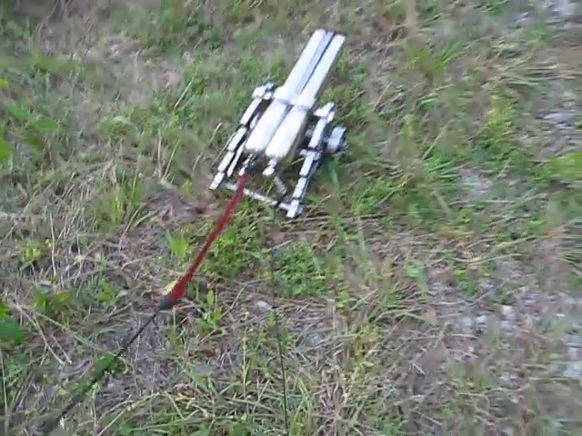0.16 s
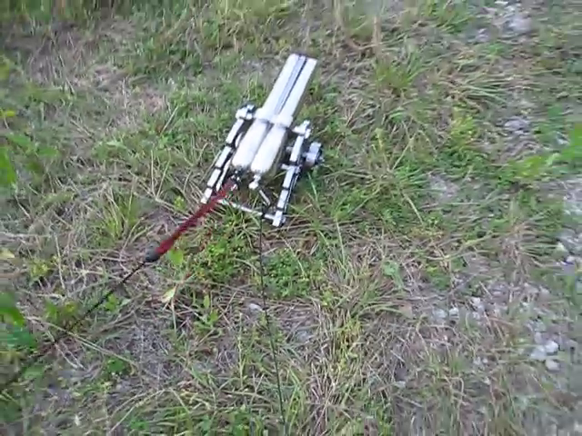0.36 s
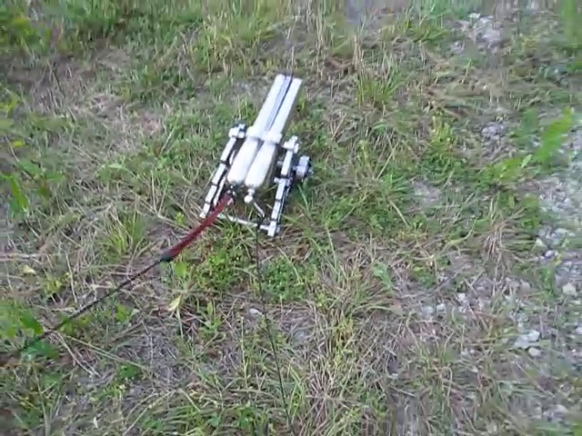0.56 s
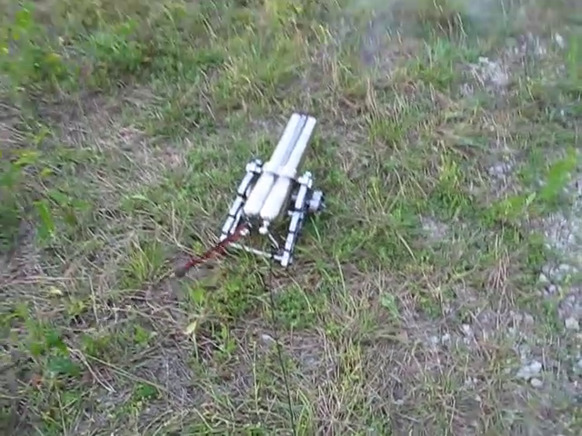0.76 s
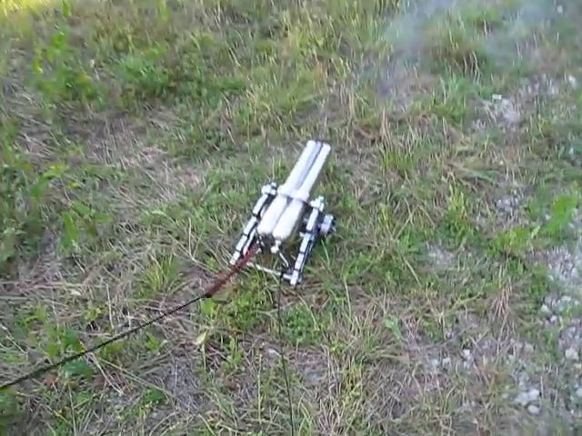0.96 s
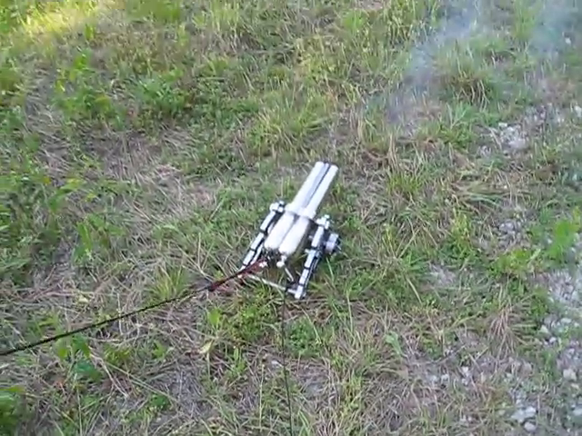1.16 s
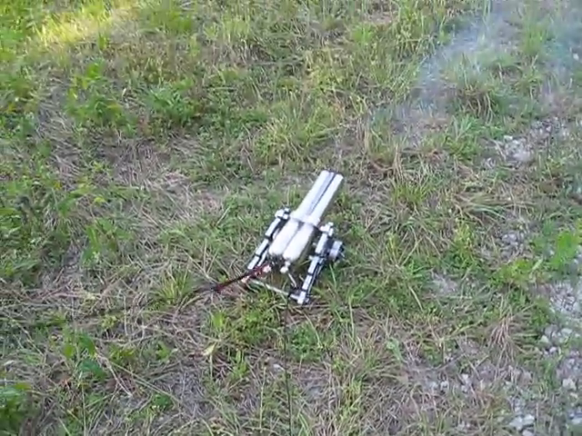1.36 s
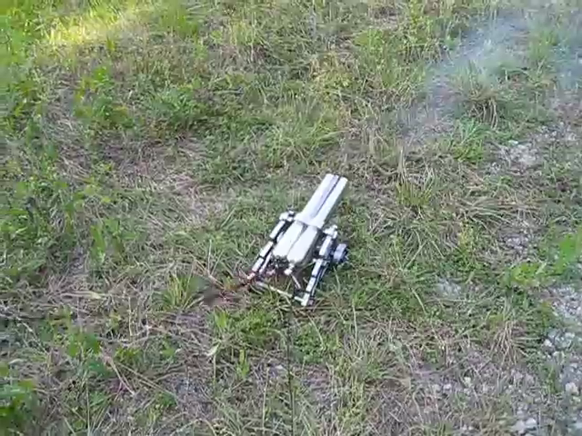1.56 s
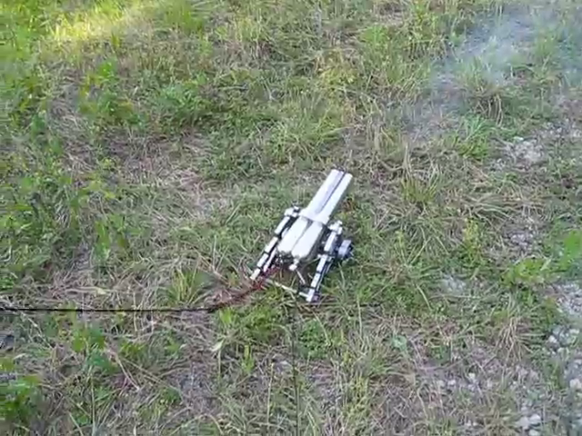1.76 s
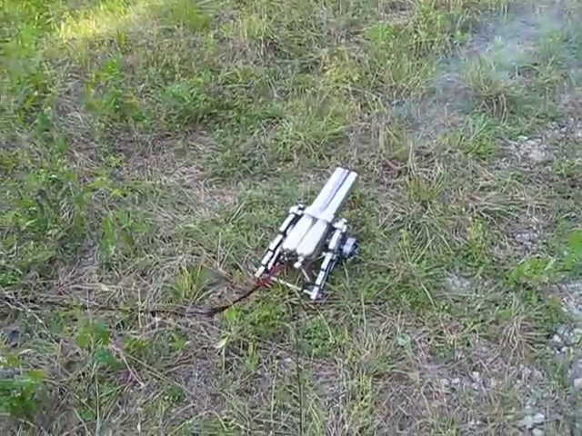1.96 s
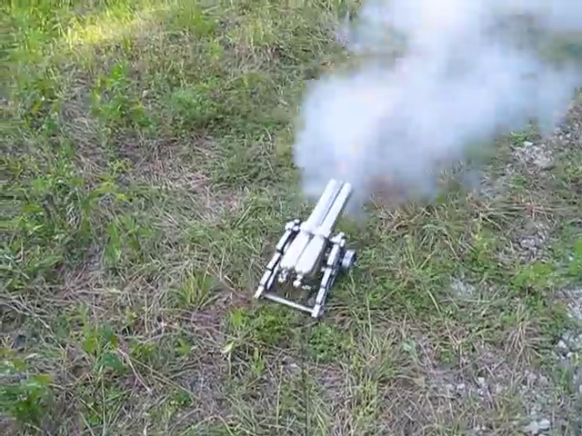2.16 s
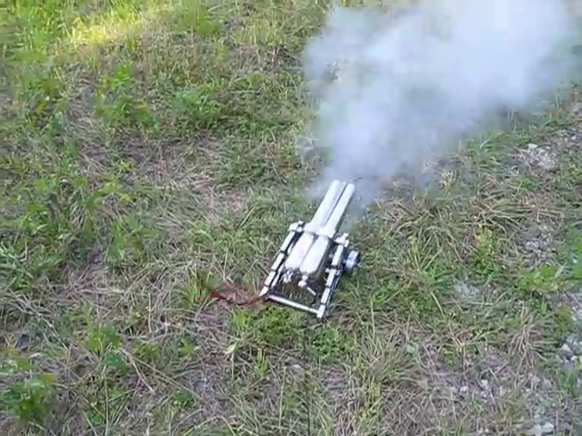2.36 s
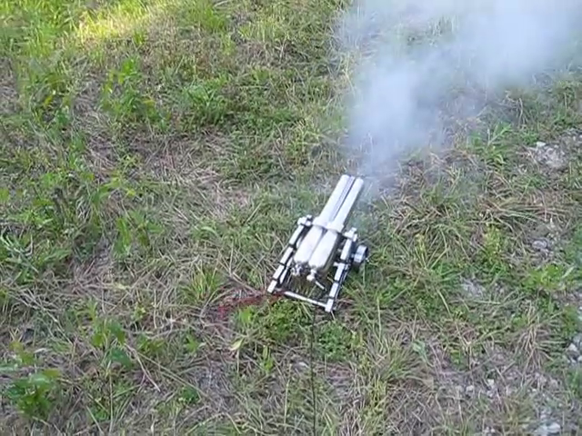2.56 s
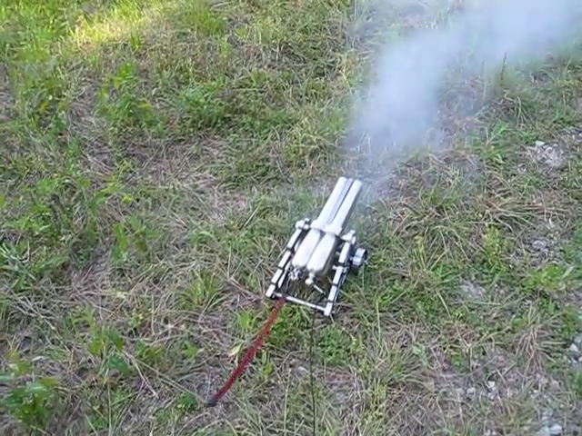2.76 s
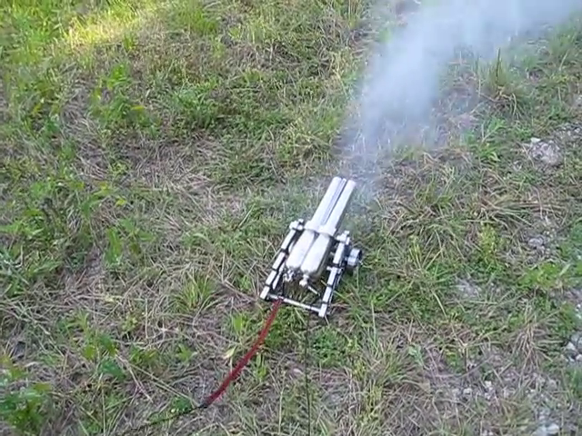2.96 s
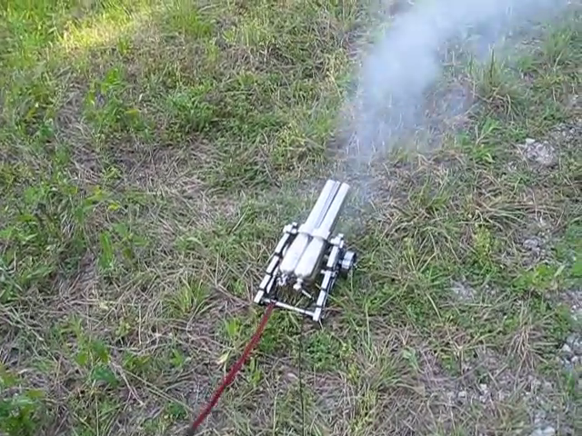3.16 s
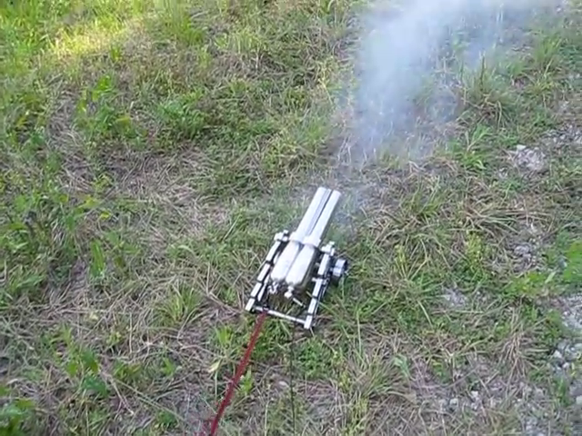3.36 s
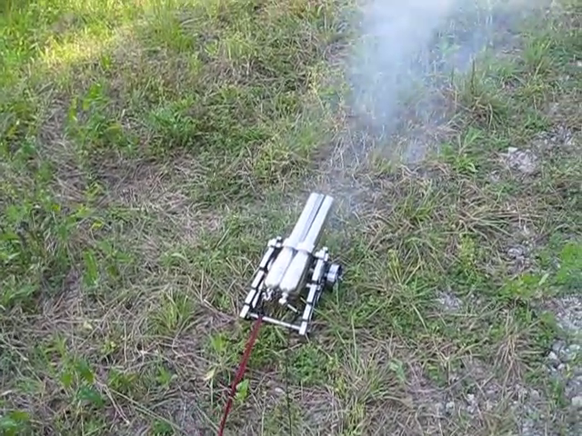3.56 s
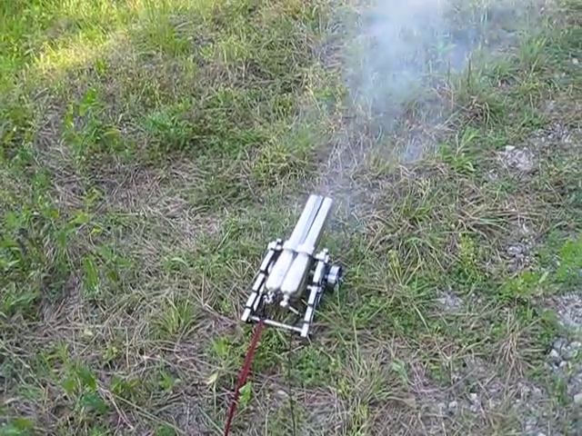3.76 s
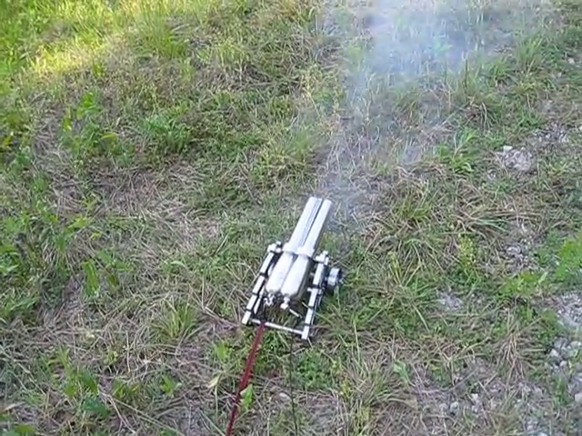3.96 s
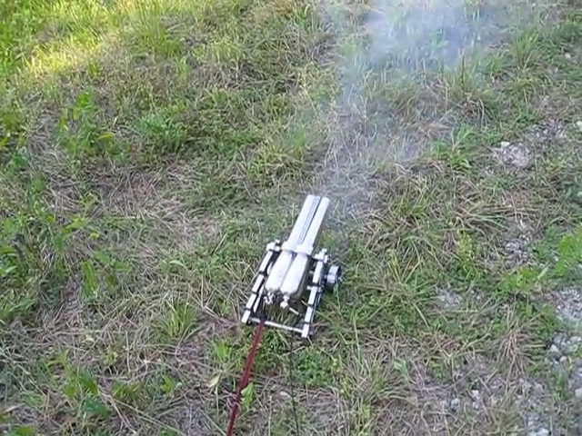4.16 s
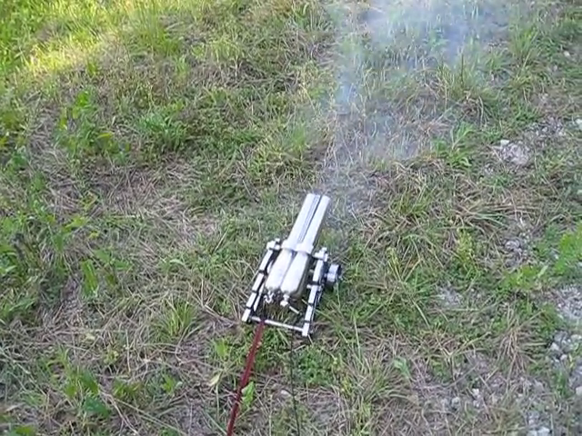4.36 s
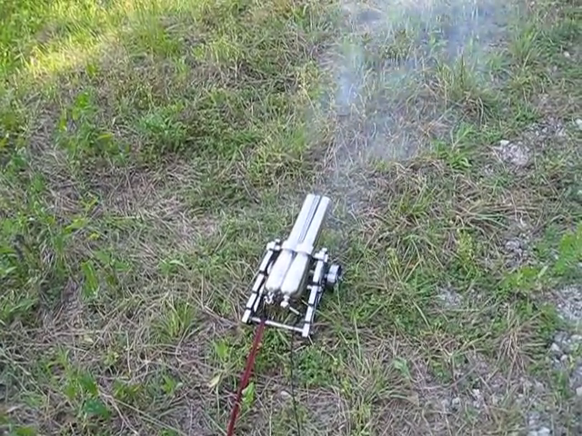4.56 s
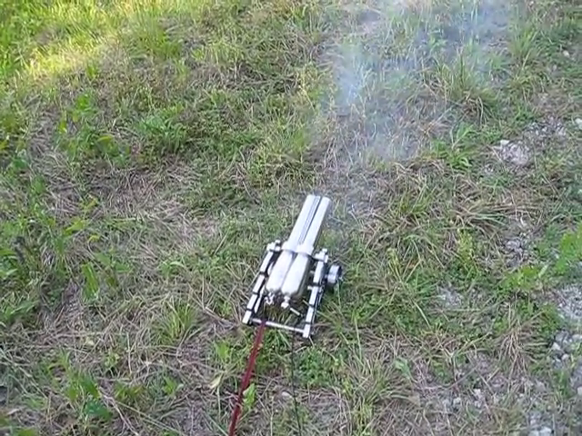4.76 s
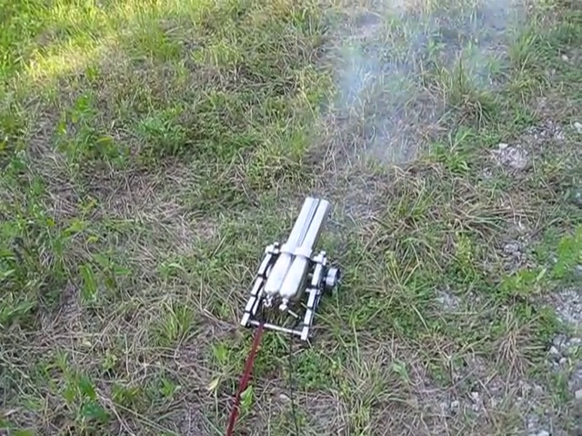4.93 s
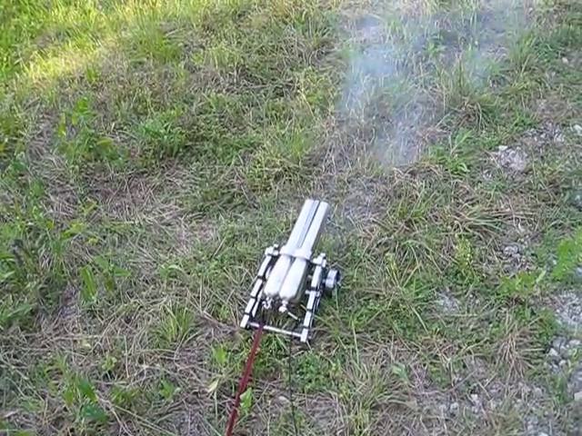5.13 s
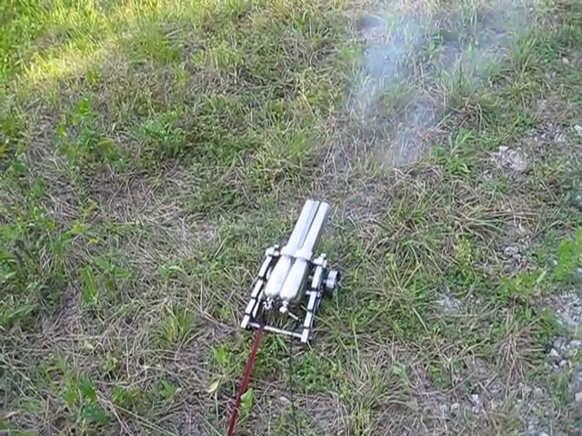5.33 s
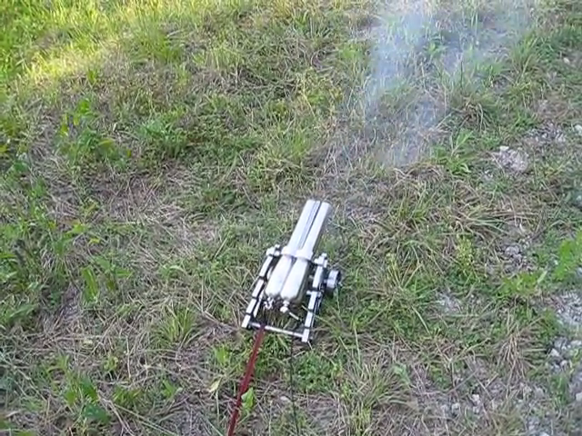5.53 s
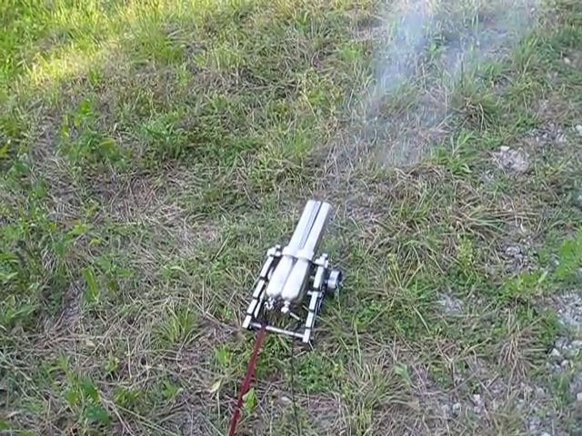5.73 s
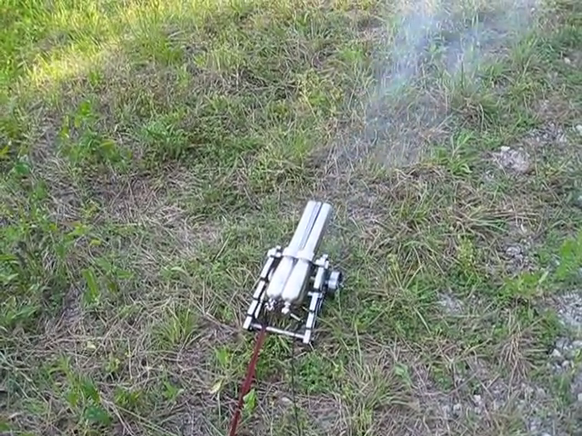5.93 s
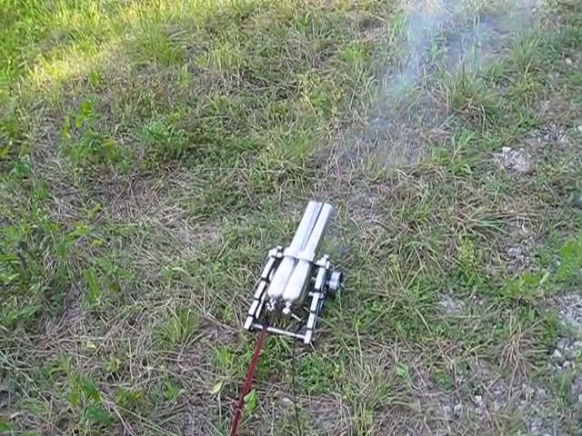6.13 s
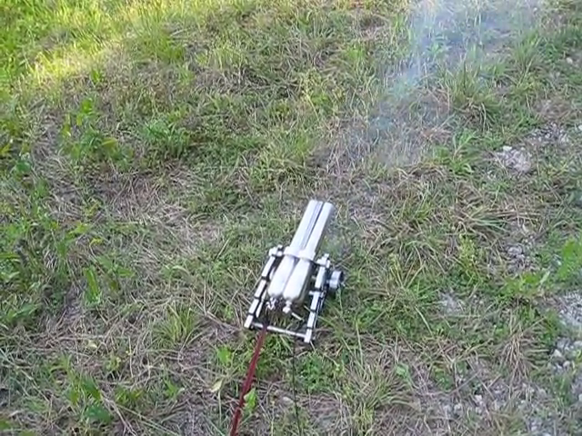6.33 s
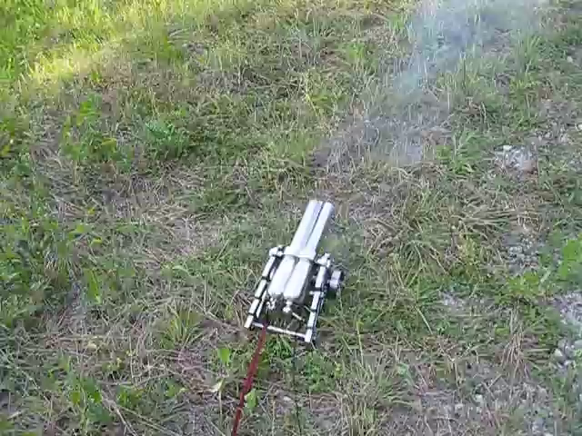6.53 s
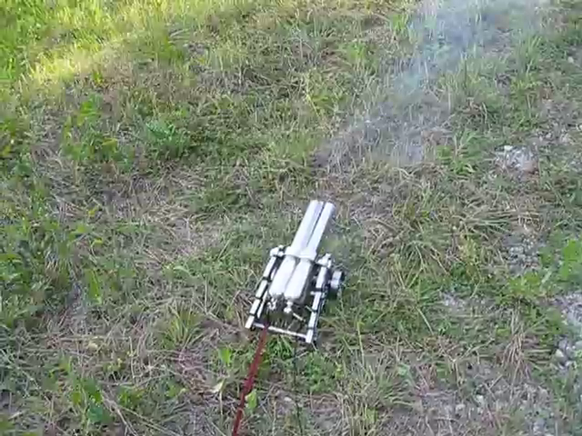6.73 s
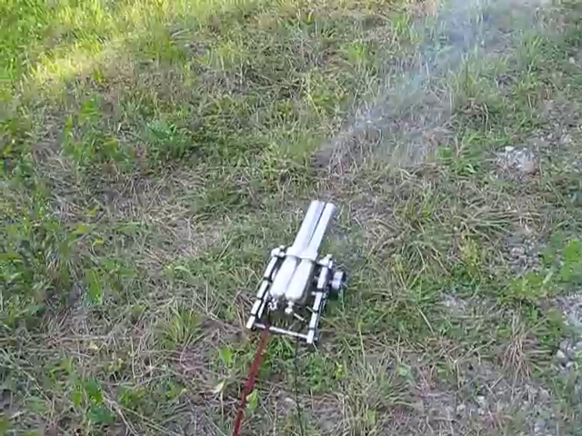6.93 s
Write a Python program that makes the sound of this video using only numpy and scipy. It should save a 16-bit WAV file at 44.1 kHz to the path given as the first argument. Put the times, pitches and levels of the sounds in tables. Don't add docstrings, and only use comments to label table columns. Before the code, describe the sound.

Light handling clicks and soft rustle outdoors, one violent overloaded bang at two seconds, slapback echoes, a darkening roar, then faint birds and a twig snap.

```python
import sys
import numpy as np
from scipy import signal
from scipy.fft import rfft, irfft, next_fast_len
from scipy.io import wavfile
from scipy.ndimage import uniform_filter1d

SR = 44100
rng = np.random.default_rng(int(sys.argv[2]) if len(sys.argv) > 2 else 0)


def log_audio(samples):
    frames = np.atleast_2d(samples).T
    limited = np.clip(frames, -1, 1)
    pcm = np.round(limited * 32767).astype(np.int16)
    wavfile.write(sys.argv[1], SR, pcm)


def elevation(decibels):
    levels = np.asarray(decibels, float)
    return 10 ** (levels / 20)


N = 312624
TIME = np.arange(N) / SR
COARSE_TIME = TIME[::32]


def noise(n=N):
    return rng.standard_normal(n)


def walk(rate_hz):
    hold = int(SR / rate_hz)
    steps = np.repeat(noise(N // hold + 1), hold)
    return 1.35 * uniform_filter1d(uniform_filter1d(steps, hold), hold)[:N]


def unit(x):
    return x / np.sqrt(np.mean(x ** 2))


def band(x, hz, width_hz):
    return signal.lfilter(*signal.iirpeak(hz, hz / width_hz, SR), x)


def band_twice(x, hz, width_hz):
    return unit(band(band(x, hz, width_hz), hz, width_hz))


def bin_hz(size):
    return np.maximum(np.arange(size // 2 + 1) * SR / size, 1.)


def tint(x, colour):
    size = next_fast_len(len(x))
    hz, db = np.transpose(colour)
    gain_db = np.interp(np.log(bin_hz(size)), np.log(hz), db)
    return unit(irfft(rfft(x, size) * elevation(gain_db), size)[:len(x)])


def thirds(x):
    size = next_fast_len(len(x))
    spectrum = rfft(x, size)
    place = 3 * np.log2(bin_hz(size))
    for hz in 25 * 2 ** (np.arange(29) / 3):
        triangle = np.clip(1 - abs(place - 3 * np.log2(hz)), 0, 1)
        yield hz, irfft(spectrum * triangle, size)[:len(x)]


def add(out, s, piece):
    i = int(s * SR)
    out[i:i + len(piece)] += piece[:N - i]


def swell(s, db, rise_s, fall_s):
    away = (COARSE_TIME - s) / np.where(COARSE_TIME < s, rise_s, fall_s)
    return np.interp(TIME, COARSE_TIME, elevation(db - 12 * away ** 2))


def bursts(events):
    out, t = np.zeros(N), TIME[:9000]
    for s, db, rise_s, t60_s, hz, width_hz in events:
        shape = (1 - np.exp(-t / rise_s)) * elevation(-60 * t / t60_s)
        add(out, s, elevation(db) * shape * band_twice(noise(len(t)), hz, width_hz))
    return out


def strikes(events, overtone_ratio, late_s):
    out, t = np.zeros(N), TIME[:2500]
    for s, db, hz, t60_s, overtone_db, edge_db in events:
        shape = (1 - np.exp(-t * hz / 0.36)) ** 2 * elevation(-60 * t / t60_s)
        overtone_gain = elevation(overtone_db + 3.0 - 60 * t / (1.5 * t60_s))
        overtone = overtone_gain * np.sin(2 * np.pi * overtone_ratio * hz * t)
        ring = shape * (np.sin(2 * np.pi * hz * t) - overtone)
        edge = band(noise(len(t)), 13500.0, 15000.0) * elevation(-60 * t / 0.0035)
        add(out, s + late_s, elevation(db) * (ring / shape.max() + elevation(edge_db + 7.0) * edge))
    return out


# f/Hz, density/dB
FIELD_COLOUR = [(20, -15), (43, -8.5), (90, -1), (160, -6), (300, -6), (500, -2.5), (760, 0), (1150, -2.5),
                (1500, -7.5), (2900, -14), (3500, -17.5), (9000, -24), (14000, -31.5), (17300, -40)]
FIELD_DB = -42
DUCK_FROM_DB, DUCK_SHARE = -19, 0.32


def field():
    air = tint(noise(), FIELD_COLOUR)
    bass = signal.lfilter(*signal.butter(2, 250., fs=SR), air)
    air = (air - bass) * elevation(.4 * walk(2.97)) + bass * elevation(1.8 * walk(5))
    duck_db = -DUCK_SHARE * np.clip(roll_level_db() - DUCK_FROM_DB, 0, None)
    return air * elevation(FIELD_DB + duck_db)


# t/s, length/s, first f/Hz, last f/Hz, level/dB
CHIRPS = [(1.008, .025, 1600, 2000, -46), (1.022, .065, 2090, 1830, -43), (1.085, .11, 1840, 2010, -48),
          (1.075, .25, 2060, 1900, -52), (1.025, .035, 3100, 2950, -52), (1.075, .07, 2770, 2800, -55),
          (1.22, .14, 1950, 1900, -54), (1.2, .02, 1850, 1700, -49), (1.625, .05, 1870, 1740, -47),
          (2.02, .05, 2480, 2150, -56), (4.735, .23, 2520, 2330, -50.5), (4.73, .12, 3350, 3300, -56.5),
          (5.275, .1, 2520, 2450, -52), (5.79, .04, 2080, 2020, -52), (5.84, .04, 1720, 1680, -52)]
SLIDES = [
    (4.85, .18, 3230, 2860, -44.5),
    (5.4, .18, 3150, 2780, -52.5),
    (1.42, .125, 1900, 2030, -50),
]
CHIRP_FADE_DB, SLIDE_GROW_DB = 8, 15
CHIRP_SAG, SLIDE_SAG = 1.2, 2.3


def whistles():
    out, wobble, flutter = np.zeros(N), 1 + .006 * walk(150), elevation(2.1 * walk(90))
    kinds = (CHIRPS, 0, -CHIRP_FADE_DB, CHIRP_SAG), (SLIDES, -SLIDE_GROW_DB, 0, SLIDE_SAG)
    for notes, first_db, last_db, sag in kinds:
        for start_s, length_s, first_hz, last_hz, db in notes:
            span = slice(int(start_s * SR) - 400, int((start_s + length_s) * SR) + 400)
            done = np.clip((TIME[span] - start_s) / length_s, 0, 1)
            hz = (first_hz + (last_hz - first_hz) * done ** sag) * wobble[span]
            phase = 2 * np.pi * np.cumsum(hz) / SR
            gain = (done > 0) * (done < 1) * elevation(db + first_db + (last_db - first_db) * done)
            gain = uniform_filter1d(gain, size=400)
            out[span] += np.sqrt(2) * gain * flutter[span] * np.sin(phase)
    return out


# t/s, length/s, f/Hz, level/dB
TRILLS = [
    (1.536, 0.14, 2960, -55),
    (5.975, .125, 2970, -52.5),
    (6.100, .1, 2900, -53.5),
]


def trills():
    out, pips = np.zeros(N), noise() * elevation(2.5 * walk(90))
    for start_s, length_s, hz, db in TRILLS:
        gate = uniform_filter1d(1. * (TIME > start_s) * (TIME < start_s + length_s), size=600)
        out += elevation(db) * gate * band_twice(pips, hz, 240.)
    return out


# peak t/s, level/dB, rise/s, fall/s
PUFFS = [
    (.06, -41, .08, .12),
    (.195, -38, .05, .05),
    (.34, -46, .05, .06),
    (.5, -41, .09, .18),
    (.78, -54, .12, .1),
    (1.52, -42.5, .15, .14),
]


def wind():
    rumble = band(noise() * elevation(2.0 * walk(40.1)), 73.0, 100.0)
    rumble = unit(band(rumble, 76.0, 150.0))
    return sum(swell(*puff) for puff in PUFFS) * rumble


# peak t/s, level/dB, rise/s, fall/s, body minus level/dB
RUSTLE = [
    (.075, -47, .035, .035, 2),
    (.17, -57, .15, .08, -4),
    (.47, -49.5, .33, .3, 4),
    (.66, -48.5, .025, .07, 1),
    (.75, -55, .08, .15, -2),
]
# f/Hz, density/dB
RUSTLE_COLOUR = [(1500, -35), (3000, -14), (4500, 4), (8000, 3), (11000, 1), (14500, -1), (17000, -9)]


def rustle():
    grains = noise() * elevation(1.7 * walk(400))
    hiss = tint(grains, RUSTLE_COLOUR)
    body = unit(band(band(grains, 1200., 1900.), 1200., 2600.))
    return sum(swell(s, db, rise_s, fall_s) * (hiss + elevation(body_db) * body)
               for s, db, rise_s, fall_s, body_db in RUSTLE)


# t/s, peak/dB, ring f/Hz, ring t60/s, overtone minus peak/dB
SNAPS = [(.665, -39, 5000, .005, 1), (1.05, -37, 2300, .005, -9), (1.19, -48, 5000, .005, 1),
         (4.0518, -20, 2000, .0056, -5), (4.0536, -4.5, 1680, .0041, -9), (4.056, -22, 1950, .017, -17),
         (5.9343, -36.5, 3800, .015, -22), (5.936, -38, 3300, .015, -22), (5.9548, -35, 3850, .014, -22),
         (6.195, -31, 1850, .0093, -20), (6.3234, -44, 5000, .005, 2)]
SNAP_EDGE_HZ, SNAP_EDGE_DB_OCTAVE = 5000., 17


def snaps():
    events = []
    for s, db, hz, t60_s, overtone_db in SNAPS:
        edge_db = overtone_db + SNAP_EDGE_DB_OCTAVE * np.log2(hz / SNAP_EDGE_HZ)
        events.append((s, db, hz, t60_s, overtone_db, edge_db))
    return strikes(events, 2.1, 0)


# t/s, level/dB, t60/s, f/Hz, width/Hz
SCRAPES = [(.066, -30, .11, 1300, 2037), (.101, -26, .02, 750, 900), (.712, -30, .12, 1026, 1300),
           (.734, -25.5, .075, 650, 830), (1.142, -29, .063, 880, 900), (3.592, -31, .15, 4259, 3500),
           (3.598, -42, .10, 9000, 6000), (3.6, -45, .10, 14600, 3000), (3.705, -45, .35, 4630, 4630),
           (4.0512, -28.5, .012, 5500, 5000), (6.14, -39, .10, 3000, 2200), (6.188, -27, .09, 1600, 1000)]
SCRAPE_RISE_SHARE = .08


def scrapes():
    return bursts([(s, db, SCRAPE_RISE_SHARE * t60_s, t60_s, hz, width_hz)
                   for s, db, t60_s, hz, width_hz in SCRAPES])


# t/s, peak/dB, ring f/Hz
KNOCKS = [(.053, -19, 150), (.062, -25, 190), (.079, -25.5, 330), (.1855, -30, 169), (.2015, -19.5, 192),
          (.347, -32.5, 110), (.443, -37, 140), (.454, -30, 130), (.466, -28, 149), (.477, -26, 160),
          (.489, -29, 170), (.4945, -23.5, 200), (.504, -26, 169), (.512, -23, 151), (.524, -28, 170),
          (.55, -25.5, 170), (.575, -31, 140), (.6, -36, 120)]
KNOCK_CYCLES, KNOCK_OVERTONE_DB, KNOCK_EDGE_DB = 4.3, -8, -48


def knocks():
    return strikes([(s, db, hz, KNOCK_CYCLES / hz, KNOCK_OVERTONE_DB, KNOCK_EDGE_DB)
                    for s, db, hz in KNOCKS], 1.92, -0.0011)


# t/s, peak/dB, ring f/Hz, overtone minus peak/dB, edge minus peak/dB
TICKS = [(.084, -18.5, 450, -8, -26), (.1147, -3, 960, -13, -15), (.177, -8.5, 1140, -23, -38),
         (.189, -29, 401, -18, -29), (.195, -24, 1110, -21, -28), (.209, -24, 991, -17, -29),
         (.33, -15, 945, -11, -19), (.3655, -23, 738, -18, -19), (.371, -26.5, 1280, -17, -19),
         (.783, -22.5, 1090, -19, -29), (.951, -14.5, 780, -3, -19), (.991, -24, 850, -18, -30)]
TICK_T60_S, TICK_DAMP_S_DB = .0033, .00011


def ticks():
    return strikes([(s, db, hz, TICK_T60_S - TICK_DAMP_S_DB * edge_db, overtone_db, edge_db)
                    for s, db, hz, overtone_db, edge_db in TICKS], 2.39, .0007)


# t/s, level gain/dB, treble gain/dB, bass gain/dB
SURGES = [(2.121, 9, 0, 0), (2.152, 4, 0, 2), (2.182, -1, -1.5, -2), (2.235, 0, 1, 2), (2.34, .5, 0, 4),
          (2.53, 0, -2, -1), (2.625, -.5, -1.5, 5), (2.675, 1.8, 2.5, 2), (2.81, 1.8, 1, 4),
          (2.87, -1.5, 1, -1), (2.935, 1.2, 0, 0), (2.98, 1.2, -1.5, 3), (3.15, 0, -2, 1), (3.23, 0, -2, 2),
          (3.46, 0, 0, 1), (3.62, 1, 0, 0), (3.72, 0, 0, -3), (3.9, 0, 1.5, 2), (4.08, 0, 2, 3)]
SHOT_S = 2.09
SURGE_HALF_S = .042


def surge(column):
    gain_db = 0
    for row in SURGES:
        half_s = SURGE_HALF_S * (row[0] - SHOT_S) ** .5
        gain_db = gain_db + row[column] * np.exp(-((COARSE_TIME - row[0]) / half_s) ** 2)
    return np.interp(TIME, COARSE_TIME, gain_db)


# t/s, level/dB
ROLL = [
    (2.108, -55),
    (2.128, -29),
    (2.205, -26.5),
    (2.225, -20.5),
    (2.5, -17.5),
    (3.1, -16.3),
    (3.5, -23),
    (4.45, -40),
    (5.5, -60),
]


def roll_level_db():
    s, db = np.transpose(ROLL)
    return np.interp(TIME, s, db, left=-120., right=-120.)


# f/Hz, density/dB
ROLL_COLOUR = [(25, -37), (80, -8), (144, -6.5), (345, -7.5), (520, -1.5), (680, 2), (1150, -0.5),
               (1400, -5), (2000, -8), (3050, -13.5), (3500, -20.5), (5000, -27.5), (7000, -37),
               (18000, -85)]
ROLL_REF_TREBLE_DB, ROLL_REF_BASS_DB = -17.5, -13.5
AIR_FROM_S, AIR_START_DB, AIR_LOSS_DB, AIR_TIME_S = 2.22, -4.8, -38, 1.8
BASS_DB, BASS_NEAR_DB, BASS_NEAR_S = -14.5, 6, .04
BASS_LINGERS_FROM_S, BASS_LINGERS_DB_S = 3.7, 4.5
DEEP_START_DB, DEEP_GROWS_DB_S, DEEP_TOP_DB, DEEP_HZ = -7.5, 8, 8, 150.


def roll():
    span = slice(int(ROLL[0][0] * SR), int(ROLL[-1][0] * SR))
    late_s = np.clip(TIME - AIR_FROM_S, 0, None)
    treble_db = AIR_START_DB + AIR_LOSS_DB * (1 - np.exp(-late_s / AIR_TIME_S)) + surge(2)
    treble_db = treble_db[span] - ROLL_REF_TREBLE_DB
    bass_db = BASS_DB + BASS_NEAR_DB * np.exp(-late_s / BASS_NEAR_S)
    bass_db = bass_db + BASS_LINGERS_DB_S * np.clip(TIME - BASS_LINGERS_FROM_S, 0, None)
    bass_db = bass_db + surge(3) + 1.1 * walk(14)
    bass_db = bass_db[span] - ROLL_REF_BASS_DB
    deep_db = np.minimum(DEEP_START_DB + DEEP_GROWS_DB_S * late_s[span], DEEP_TOP_DB)
    echoes = tint((noise() * elevation(0.66 * walk(250)))[span], ROLL_COLOUR)
    out, heard = np.zeros(N), 0
    for hz, part in thirds(echoes):
        air = np.clip(np.log(hz / 877.0) / np.log(4200 / 946.0), 0, None) ** 1.7
        ground = np.clip(np.log(510.0 / hz), 0, 1)
        deep = np.clip(2 * np.log(DEEP_HZ / hz), 0, 1)
        heard = heard + part * elevation(air * treble_db + ground * bass_db + deep * deep_db)
    out[span] = heard
    return out * elevation(roll_level_db() + surge(1) + 0.97)


BARREL_EDGE_DB = -45
# t/s, peak/dB, ring f/Hz
THUMPS = [
    (2.64, -21, 175),
    (2.8, -22, 140),
    (2.968, -17.5, 102),
    (3.09, -21, 225),
    (3.595, -25, 205),
    (4.03, -32, 135),
]
THUMP_CYCLES, THUMP_OVERTONE_DB = 11, -9


def thumps():
    return strikes([(s, db, hz, THUMP_CYCLES / hz, THUMP_OVERTONE_DB, BARREL_EDGE_DB)
                    for s, db, hz in THUMPS], 1.9, 0)


# t/s, peak/dB
SLAPS = [
    (2.148, -5),
    (2.1545, -9),
    (2.2185, -12),
    (2.24, -9),
    (2.2665, -10),
    (2.28, -6),
    (2.352, -17),
]


def slaps():
    out, t = np.zeros(N), TIME[:200]
    wave = np.exp(-t / 0.00054) * np.cos(2 * np.pi * 890.0 * t)
    wave = signal.lfilter(*signal.butter(2, 4500., fs=SR), wave)
    for s, db in SLAPS:
        add(out, s, elevation(db) * wave / wave.max())
    return out


# t/s, peak/dB, ring f/Hz, overtone minus peak/dB
BARREL = [
    (2.1111, -2.5, 560, -6),
    (2.1065, -12, 140, 2),
]
BARREL_T60_S = .032


def barrel():
    return strikes([(s, db, hz, BARREL_T60_S, overtone_db, BARREL_EDGE_DB)
                    for s, db, hz, overtone_db in BARREL], 1.9, 0)


# t/s, level/dB, rise/s, t60/s, f/Hz
SHOT = [
    (2.0961, -20, .003, .028, 4500),
    (2.1048, -12, .0004, .020, 8600),
    (2.1061, 5, .0015, .038, 1200),
    (2.1068, 11.5, .0012, .018, 3900),
    (2.1120, -14, .0024, .08, 6500),
]
SHOT_WIDTH = 1.65


def shot():
    return bursts([(s, db, rise_s, t60_s, hz, SHOT_WIDTH * hz) for s, db, rise_s, t60_s, hz in SHOT])


def scene():
    background = field() + whistles() + trills() + wind()
    near = rustle() + snaps() + scrapes() + knocks() + ticks()
    echoes = roll() + thumps() + slaps()
    return (background + near + echoes + barrel() + shot())[None]


def band_limit(x):
    return signal.sosfilt(signal.butter(12, 18300, fs=SR, output="sos"), x)


def record(dry):
    top_cut = signal.ellip(6, .2, 50, 17800, fs=SR, output="sos")
    cut = signal.sosfilt(top_cut, np.clip(dry, -1, 1))
    return band_limit(np.clip(cut, -1, 1))


dry = scene()
out = record(dry)
log_audio(out)
```